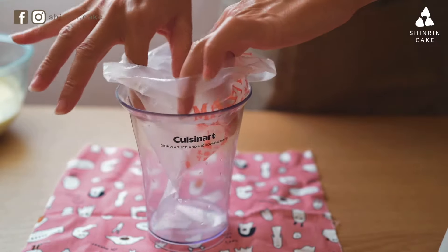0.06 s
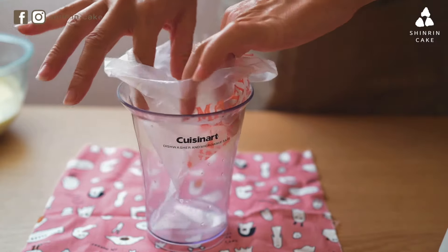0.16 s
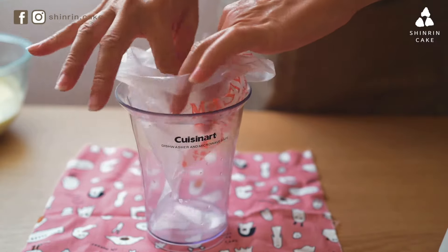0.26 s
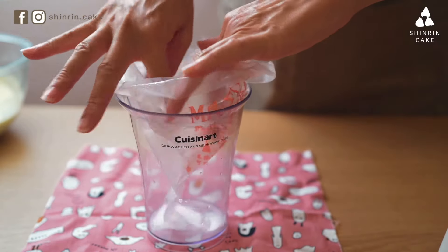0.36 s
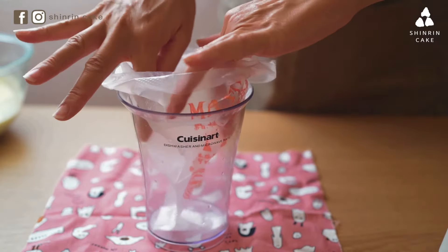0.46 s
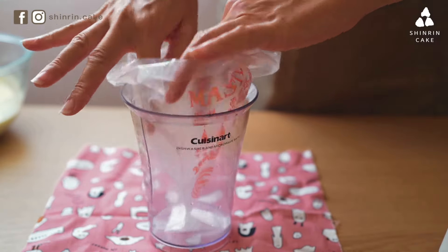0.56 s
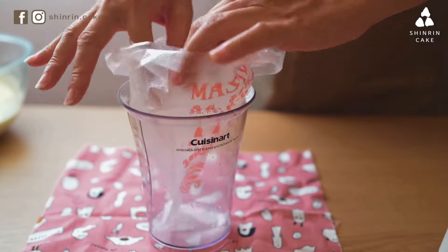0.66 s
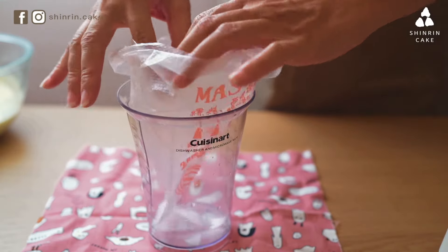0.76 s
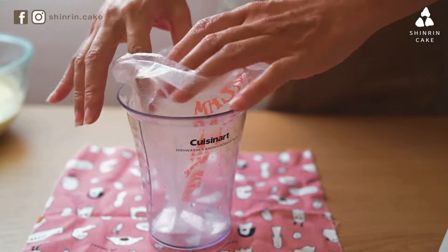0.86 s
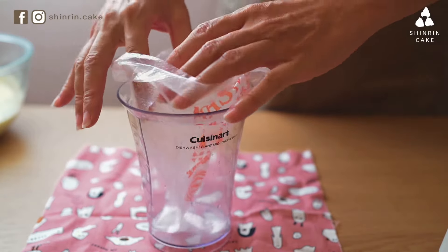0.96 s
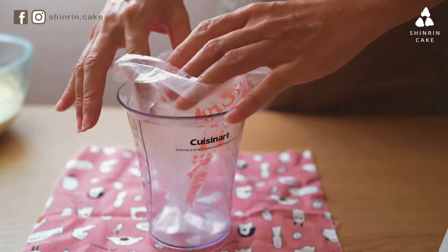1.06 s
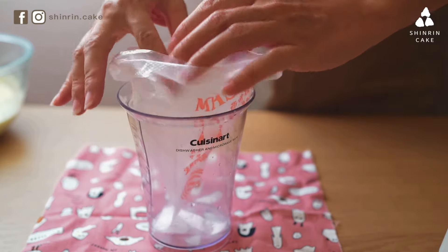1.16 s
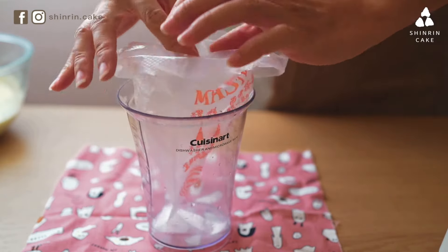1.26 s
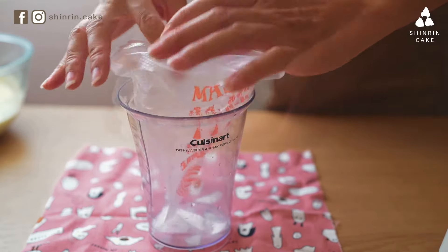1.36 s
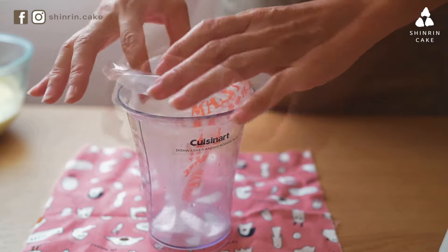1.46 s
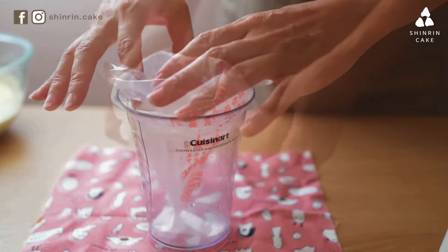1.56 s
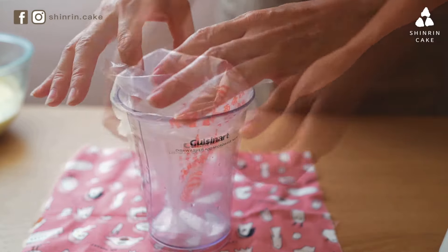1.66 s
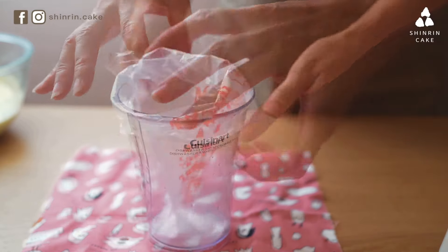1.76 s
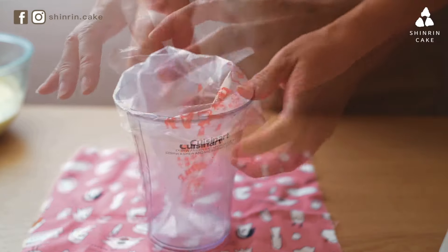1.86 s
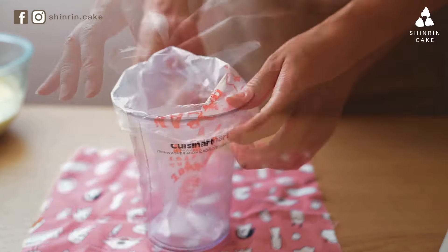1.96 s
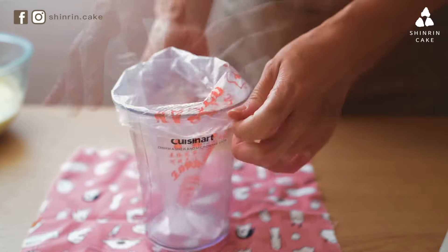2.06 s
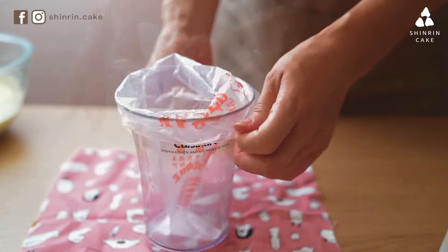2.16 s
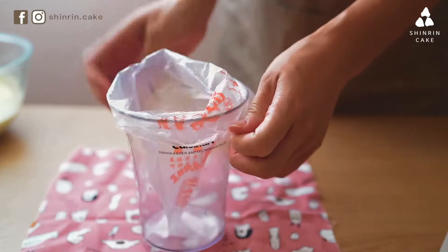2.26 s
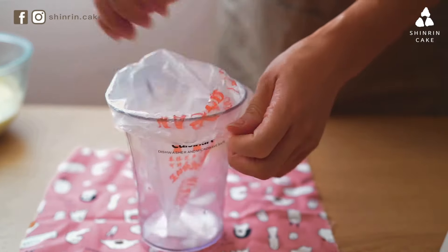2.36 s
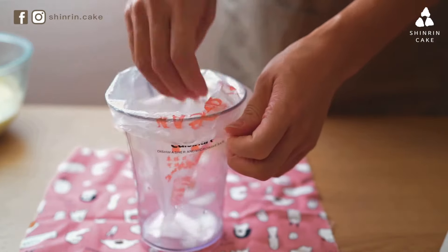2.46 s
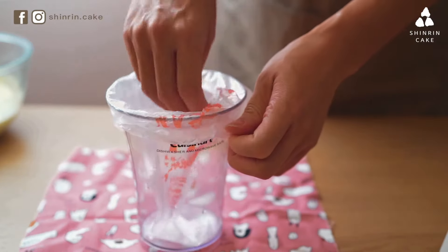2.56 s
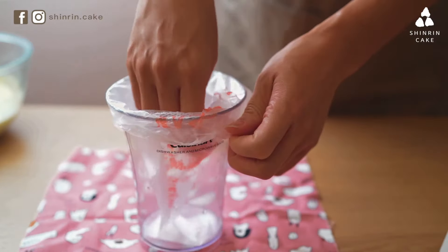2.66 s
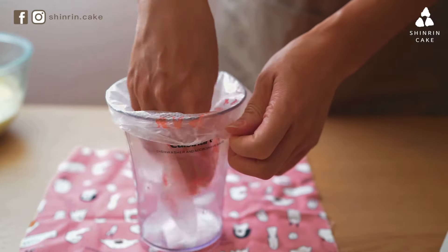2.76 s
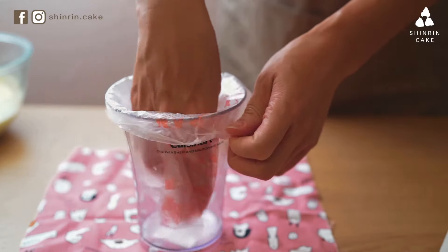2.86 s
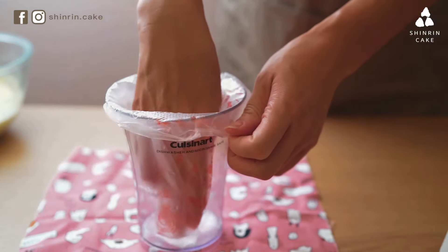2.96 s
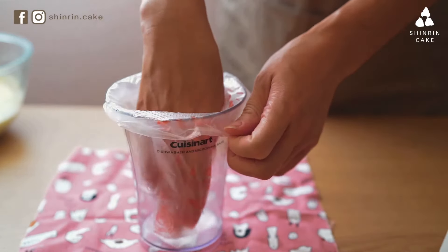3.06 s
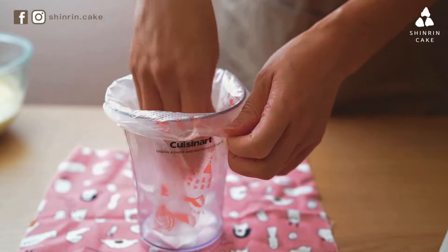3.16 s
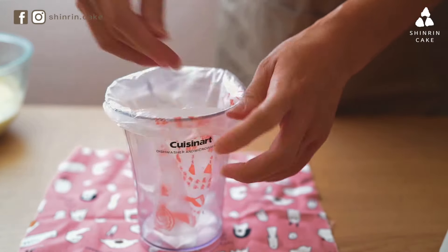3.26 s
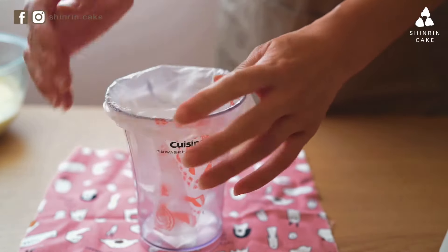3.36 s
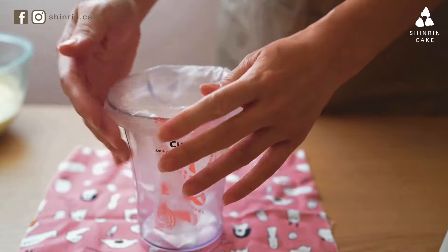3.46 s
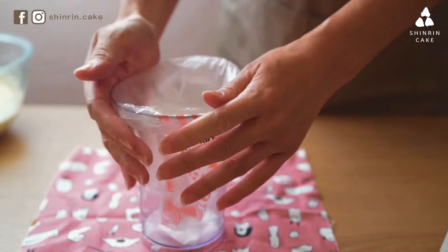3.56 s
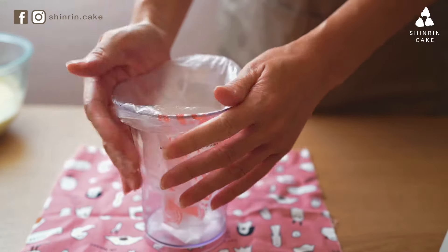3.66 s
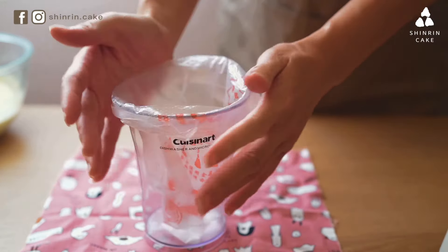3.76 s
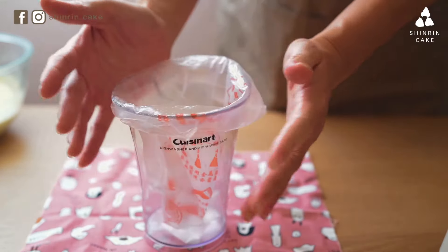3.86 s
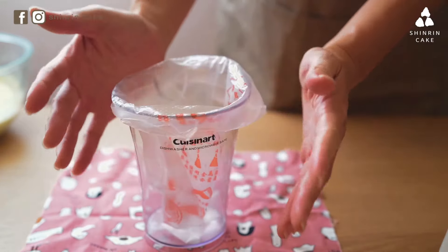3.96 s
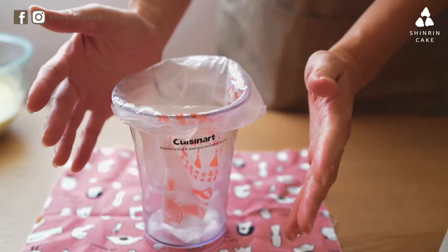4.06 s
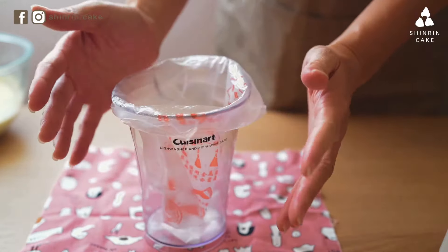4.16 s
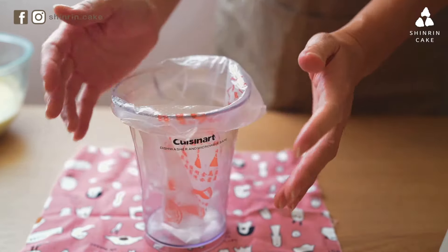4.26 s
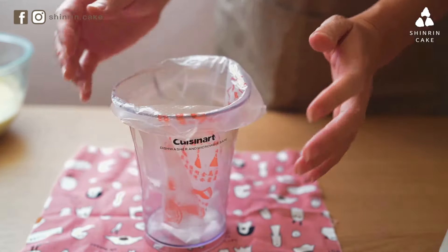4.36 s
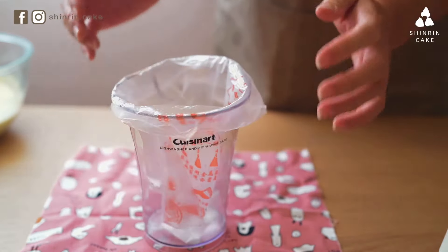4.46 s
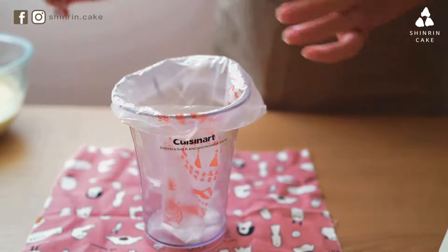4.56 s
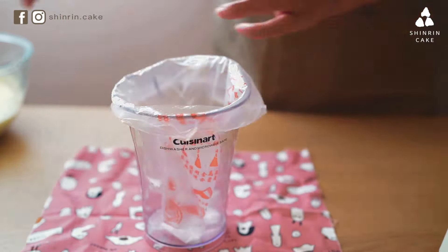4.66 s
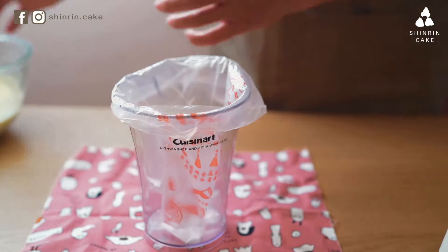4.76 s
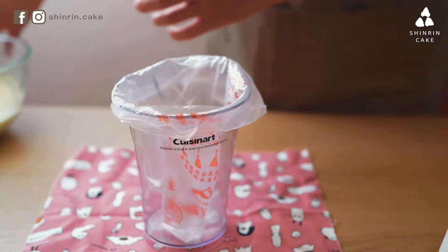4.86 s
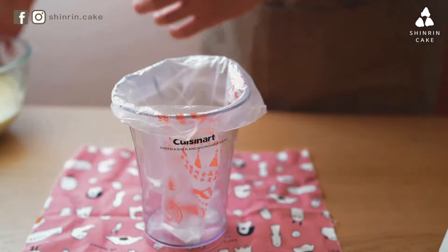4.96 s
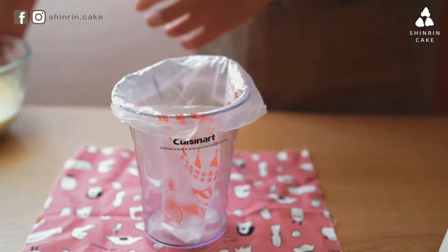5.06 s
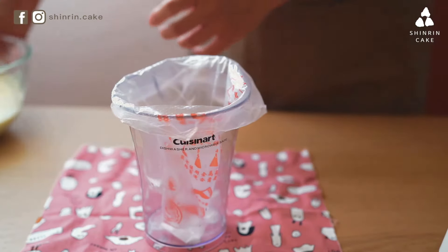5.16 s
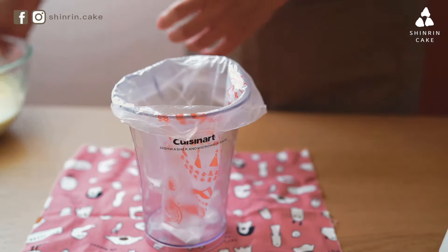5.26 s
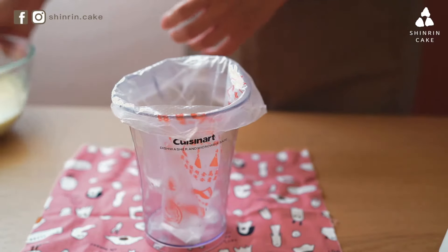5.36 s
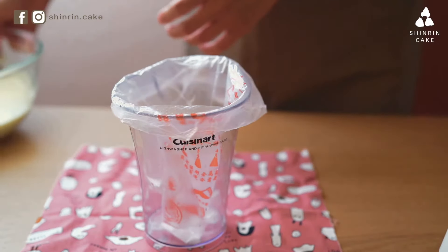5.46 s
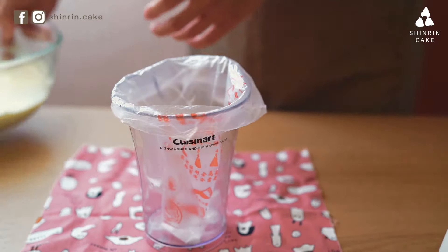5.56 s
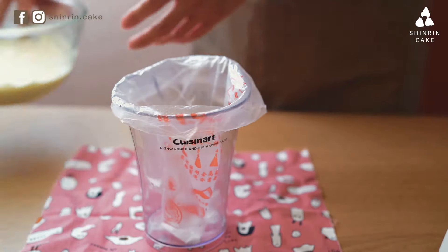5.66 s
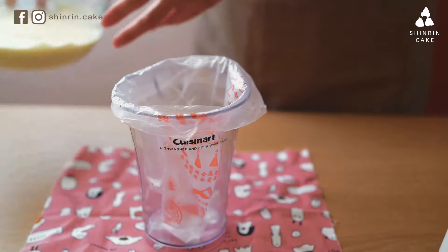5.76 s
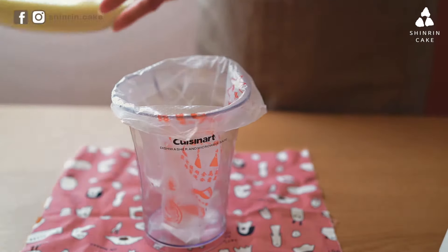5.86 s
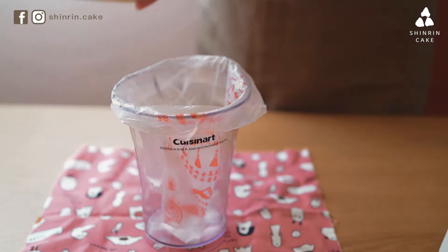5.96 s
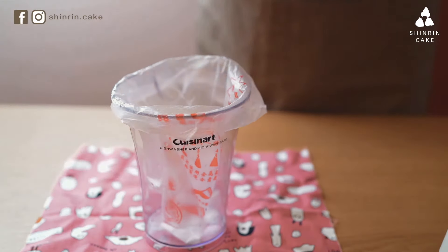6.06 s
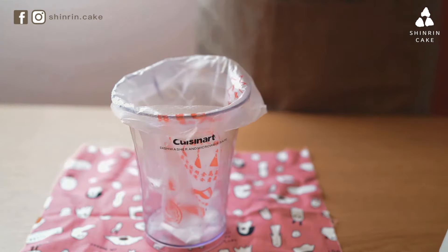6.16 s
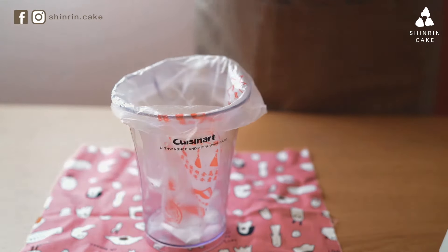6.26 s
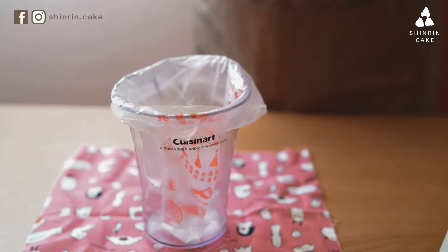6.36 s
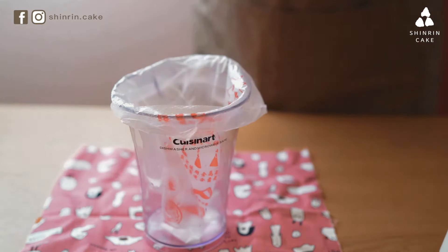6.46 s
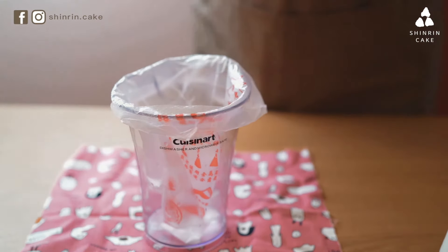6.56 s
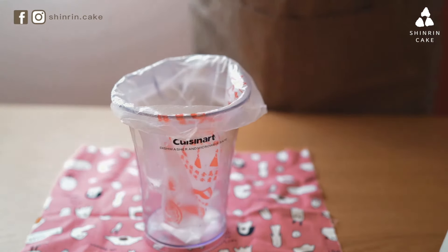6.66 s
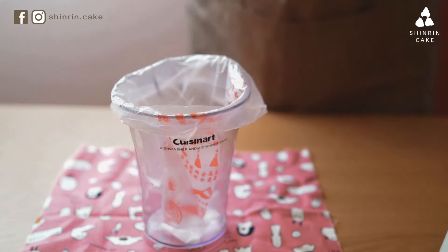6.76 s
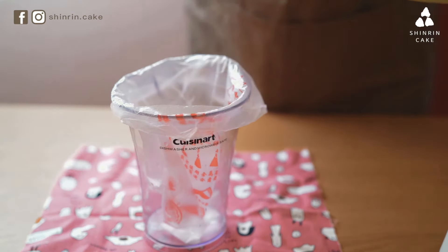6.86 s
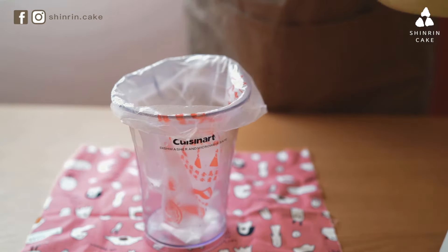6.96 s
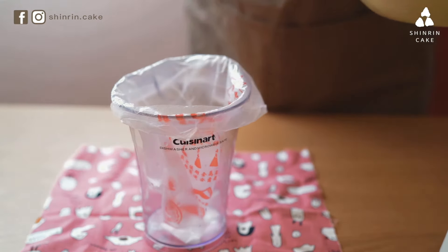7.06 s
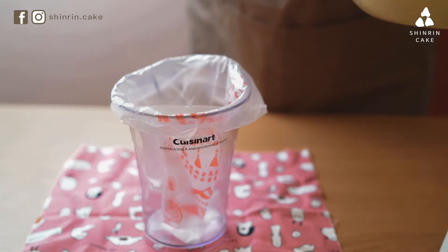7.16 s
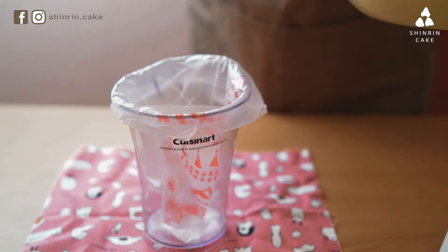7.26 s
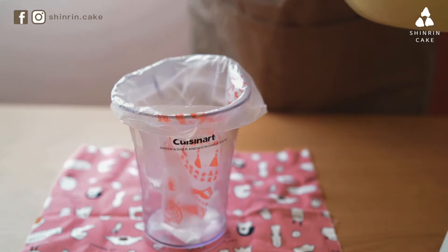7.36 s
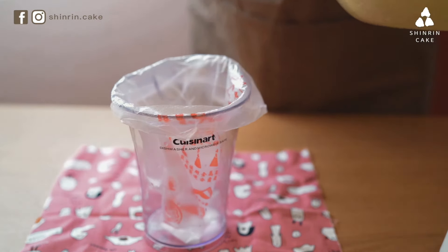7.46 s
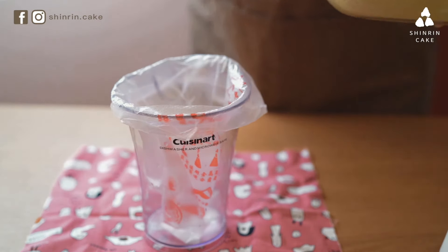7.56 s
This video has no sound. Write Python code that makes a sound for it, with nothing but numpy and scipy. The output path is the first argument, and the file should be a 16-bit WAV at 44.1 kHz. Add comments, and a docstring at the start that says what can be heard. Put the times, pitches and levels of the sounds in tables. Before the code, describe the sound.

Close to the microphone, thin plastic film crinkles busily from the start, swelling and easing with each grip, peppered with crisp pops. A rubbing stick-slip slide follows as the hand presses the lining down the cup wall. After a flurry of small snaps it falls nearly silent: low hum, a few ticks, soft sleeve rustle, a low puff of air, tiny dish clinks and thuds in a lightly reverberant kitchen.

```python
"""Over a low appliance hum, a thin plastic piping bag is folded over the rim of a tall plastic cup and pushed
down inside it: random facet rattles make the dense crackle, noise bursts with short rings the sharp snaps,
and jolted resonances the slide along the wall. Once let go, the film ticks a few times as it settles.
Then cloth brushes faintly as filtered noise, with soft bumps of low noise, a slow puff of air and light
clinks of decaying sines as a bowl is picked up."""
import sys
import numpy as np
from scipy import signal
from scipy.fft import rfft, irfft
from scipy.io import wavfile
from scipy.ndimage import uniform_filter1d

SR = 44100
rng = np.random.default_rng(int(sys.argv[2]) if len(sys.argv) > 2 else 0)


def master_out(mix):
    """Clip the mix to full scale and print it as 16-bit PCM to the path in sys.argv[1]."""
    frames = np.transpose(np.atleast_2d(mix))
    ceiling = np.clip(frames, -1, 1)
    pcm = np.round(ceiling * 32767).astype(np.int16)
    wavfile.write(sys.argv[1], SR, pcm)


N = 335595
TIME = np.arange(N) / SR


def from_db(db):
    """Decibels to gain."""
    return 10 ** (np.asarray(db) / 20)


def rms_one(x):
    """Scale to rms 1."""
    return x / np.sqrt(np.mean(x ** 2) + 1e-20)


def opening_one(x, size=132):
    """Scale to rms 1 over the first 3 ms."""
    return x / np.sqrt(np.mean(x[:size] ** 2))


def local_rms(x, seconds):
    """Running level: the power is averaged twice over a sliding window."""
    width = int(seconds * SR)
    power = uniform_filter1d(uniform_filter1d(x * x, width), width)
    return np.sqrt(np.abs(power) + 1e-12)


def add(out, s, sound):
    """Mix a sound in at time s."""
    start = max(round(s * SR), 0)
    out[start:start + len(sound)] += sound[:N - start]


def cut(x, hz, kind, order=2):
    """Butterworth filter."""
    return signal.sosfilt(signal.butter(order, hz, kind, fs=SR, output="sos"), x + 1e-18)


def resonate(x, hz, width_hz):
    """Two-pole resonance with gain 1 on top."""
    r = np.exp(-np.pi * width_hz / SR)
    feed = [(1 - r * r) / 2, 0, (r * r - 1) / 2]
    feedback = [1, -2 * r * np.cos(2 * np.pi * hz / SR), r * r]
    return signal.lfilter(feed, feedback, x + 1e-18)


def colour(x, spectrum, size=4096):
    """Causal (minimum-phase) filter that follows a spectrum."""
    hz, db = np.transpose(spectrum)
    grid = np.maximum(np.arange(size // 2 + 1) * SR / size, 1)
    log_gain = np.log(from_db(np.interp(np.log(grid), np.log(hz), db)))
    # the folded cepstrum gives the minimum phase
    cepstrum = irfft(log_gain)[:size // 2]
    cepstrum[1:] *= 2
    impulse = irfft(np.exp(rfft(cepstrum, size)))
    return signal.oaconvolve(x, impulse)[:len(x)]


def burst(t60, seconds):
    """Noise that dies away, with energy 1."""
    t = np.arange(int(seconds * SR)) / SR
    noise = rng.standard_normal(len(t)) * from_db(-60 * t / t60)
    return noise / np.linalg.norm(noise)


def mode(hz, t60, seconds):
    """A struck resonance: a sine that dies away."""
    t = np.arange(int(seconds * SR)) / SR
    return np.sin(2 * np.pi * hz * t) * from_db(-60 * t / t60)


def slow_noise(per_s):
    """Smooth random wandering with rms 1."""
    knots = rng.standard_normal(1000)
    return rms_one(np.interp(TIME * per_s, np.arange(len(knots)), knots))


def movements(rows, sag_db_per_s, release_db_per_s):
    """Gain of overlapping movements (s, attack s, hold s, dB): each swells, sags while held, then dies away."""
    attack_rise_db = 22.5  # climb over the length of the attack
    power = 1e-12
    for s, attack_s, hold_s, level_db in rows:
        t = TIME - s
        swell = attack_rise_db * np.minimum(t, 0) / attack_s
        sag = sag_db_per_s * np.clip(t, 0, hold_s)
        release = release_db_per_s * np.maximum(t - hold_s, 0)
        power = power + from_db(np.maximum(level_db + swell - sag - release, -150)) ** 2
    return np.sqrt(power)


def room_air():
    """Steady room noise, mostly low."""
    # Each row: frequency in Hz, relative level in dB per Hz.
    room_tone = [(20, -14.5), (35, -2), (80, -5.5), (110, -6), (160, 3), (260, -6.5), (500, -7.5),
                 (1000, -14), (2000, -21.5), (2800, -17.5), (4000, -39.5), (7000, -36), (16000, -42.5)]
    return from_db(-60.0) * rms_one(colour(rng.standard_normal(N), room_tone))


def appliance_hum():
    """Steady sines, each with a little narrow noise at its pitch that makes it waver."""
    # Each row: frequency in Hz, level of the sine in dB rms, time in seconds by which it has faded out.
    hum_tones = [(58.8, -63, 9), (81, -77.5, 9), (125.4, -65.5, 2.1), (154.3, -68.5, 9)]
    hum = np.zeros(N)
    for hz, level_db, end_s in hum_tones:
        waver = rms_one(resonate(rng.standard_normal(N), hz, width_hz=6))
        running = np.clip((end_s - TIME) / 0.46, 0, 1)
        tone = np.sqrt(2) * np.sin(2 * np.pi * hz * TIME)
        hum += from_db(level_db) * running * (tone + 0.16 * waver)
    return hum


def puff():
    """Moved air: very low noise that swells and fades once."""
    # The puff's level over time. Each row: time in seconds, level in dB.
    draught = [(5.87, -86), (5.91, -46), (6.04, -40.5), (6.19, -51), (6.55, -56.5), (6.8, -75)]
    s, level_db = np.transpose(draught)
    air = rms_one(cut(rng.standard_normal(N), [7, 17], "band"))
    return from_db(np.interp(TIME, s, level_db)) * air


def cloth():
    """Fibres catch and slip so densely that they merge to a soft brushing."""
    # Sleeves and apron brush as the arms move.
    # Each row: time of full speed in seconds, attack in seconds, hold in seconds, level in dB.
    brushes = [(4.55, 0.16, 0.47, -62.5), (5.4, 1, 0.14, -63), (5.54, 0.079, .01, -51.5),
               (5.95, 0.33, 0.038, -54), (6.6, 0.54, 0.24, -66.5)]
    # Tone of the fabric. Each row: frequency in Hz, relative level in dB per Hz.
    fabric = [(300, -22.5), (1000, -7), (1800, -7), (2800, 3), (3700, -5), (5000, -9.5), (8000, -21),
              (15000, -28)]
    rest_db = -74.5  # the apron never hangs quite still
    unevenness_db = 2.2 * rms_one(cut(rng.standard_normal(N), 56, "low"))
    fibres = rng.standard_normal(N) * from_db(unevenness_db)
    moving = movements(brushes, sag_db_per_s=8, release_db_per_s=113)
    speed = np.hypot(moving, from_db(rest_db))
    return speed * rms_one(colour(fibres, fabric))


def bumps():
    """Dull thuds in the table top: short bursts of low noise."""
    # Each row: start in seconds, peak in dB.
    thuds = [(5.346, -44.5), (6.746, -47)]
    out = np.zeros(N)
    for s, peak_db in thuds:
        thud = cut(burst(0.09, seconds=.2), [90, 280], "band")
        add(out, s, from_db(peak_db) * thud / np.abs(thud).max())
    return out


def strike(knocks, modes):
    """Each knock rings all the modes; a hand on the piece damps it sooner, so the ring length varies."""
    out = np.zeros(N)
    for s, level_db, length in knocks:
        for hz, mode_db, t60 in modes:
            ring = mode(hz, t60 * length, seconds=.5) * rng.choice([-1, 1])
            add(out, s, from_db(level_db + mode_db) * ring)
    return out


def bowl_clinks():
    """A glass bowl clinks lightly: its modes ring as decaying sines."""
    # Each row: start in seconds, level in dB added to every mode, ratio that scales the ring times.
    clinks = [(4.858, -59, 1.8), (6.12, -51.5, 0.26)]
    # Modes of the bowl. Each row: frequency in Hz, relative level in dB, unscaled 60 dB decay in seconds.
    bowl = [(1445, -4.5, 0.42), (2650, 2, 0.16), (2640, -2, 0.054), (4100, -5.5, 0.13), (5720, -16.5, .17)]
    return strike(clinks, bowl)


def dish_knock():
    """A dish is knocked once and its modes ring briefly."""
    # Each row: start in seconds, level in dB added to every mode, ratio that scales the ring times.
    knocks = [(6.7465, -44, 0.75)]
    # Modes of the dish. Each row: frequency in Hz, relative level in dB, unscaled 60 dB decay in seconds.
    dish = [(1160, -13, .05), (1400, -7, 0.15), (1496, -5, .06), (2400, -6.5, 0.18), (2606, 3.5, 0.041),
            (2930, -9, 0.073), (3780, -8, 0.11), (3840, -4, .05), (5360, -25, .2)]
    return strike(knocks, dish)


def slide():
    """Skin and film stick and slip along the wall, each slip jolting the resonances unevenly."""
    # The hand presses and slides down inside the lined cup.
    # Each row: time of full force in seconds, attack in seconds, hold in seconds, level in dB.
    slides = [(2.46, 0.073, 0.16, -53), (2.655, 0.12, 0.28, -30.5), (3.12, 0.28, 0.0067, -36)]
    # Film stretched against the cup wall. Each row: resonance in Hz, width in Hz, relative level in dB.
    wall = [(560, 150, -8.5), (1690, 180, -3.5), (2198, 390, -3.5), (2830, 130, 1.5)]
    slips = (rng.random(N) < 450 / SR) * from_db(2.3 * rng.standard_normal(N))
    rub = np.zeros(N)
    for hz, width_hz, level_db in wall:
        rub += from_db(level_db) * resonate(slips * rng.standard_normal(N), hz, width_hz)
    force = movements(slides, sag_db_per_s=6.5, release_db_per_s=177)
    return force * rub / local_rms(rub, seconds=0.097)


def snaps(rows):
    """A crease pops through in a few milliseconds of noise and sets the taut film ringing."""
    # Tone of the crack. Each row: frequency in Hz, relative level in dB per Hz.
    crack_tone = [(150, -17), (600, -5.5), (1000, -12.5), (1600, -6), (4000, 2.5), (7000, 3), (12000, -0.5),
                  (16000, -9.5)]
    # Modes of a taut patch of film.
    # Each row: ratio to the ring pitch, level in dB before random scatter, 60 dB decay in seconds.
    patch = [(.25, -14, 0.017), (.58, -5, 0.0076), (.86, -5.5, .008), (1, 1, 0.02), (1.14, -2, .009)]
    out = np.zeros(N)
    for s, crack_db, ring_db, hz in rows:
        pop = burst(.0085, seconds=.05) + from_db(-14) * burst(.04, seconds=.05)
        # the buckle takes a moment to spread along the crease
        spread = 1 - np.exp(-np.arange(len(pop)) / (.0004 * SR))
        crack = colour(pop * spread, crack_tone)
        ring = np.zeros(len(pop))
        for ratio, mode_db, t60 in patch:
            gain = from_db(mode_db + rng.normal(0, 1.3)) * rng.choice([-1, 1])
            ring += gain * mode(ratio * hz, t60, seconds=.05)
        add(out, s, from_db(crack_db + 0.5) * opening_one(crack))
        add(out, s, from_db(ring_db + 0.5) * opening_one(ring * spread))
    return out


def small_snaps(crackle, count=200):
    """Lesser creases snap at random while the film is worked, stronger under a firm grip."""
    per_s = 15  # candidates, before the weak moments drop out
    crack_offset_db, ring_offset_db, scatter_db = 2.5, -1.5, 3.5
    ring_hz, ring_scatter_hz = 2676, 190
    follows = 0.52  # share of the crackle's swing that a snap follows
    threshold_db = -56.5  # no lesser crease snaps under a weaker crackle
    times = np.cumsum(rng.gamma(2, .5 / per_s, count))
    crackle_db = np.interp(times, TIME, 20 * np.log10(crackle))
    force_db = -35 + follows * (crackle_db + 35)
    crack, ring, pitch = rng.standard_normal((count, 3)).T
    crack_db = force_db + crack_offset_db + scatter_db * crack
    ring_db = force_db + ring_offset_db + scatter_db * ring
    rows = np.transpose([times, crack_db, ring_db, ring_hz + ring_scatter_hz * pitch])
    return snaps(rows[crackle_db > threshold_db])


def big_snaps():
    """The loudest creases snap through while the bag is worked; the last few tick as the film settles."""
    # Each row: start in seconds, crack in dB, ring in dB (both over the first 3 ms, before a lift of 0.5 dB),
    # ring pitch in Hz.
    creases = [(0.1546, -52, -32, 2560), (0.1743, -31.5, -44.5, 2650), (0.3923, -30, -25, 2720),
               (0.4581, -26, -43, 2540), (0.6347, -32, -49.5, 3000), (0.7046, -29, -28, 2800),
               (1.0018, -33.5, -41, 3040), (1.0411, -38, -36, 2450), (1.0618, -44, -30.5, 2470),
               (1.1183, -31.5, -37, 2450), (1.2205, -42, -36, 2330), (1.2492, -42.5, -35.5, 2560),
               (1.2949, -46, -36, 1880), (1.34, -44, -46, 2630), (1.3949, -30.5, -33, 2430),
               (1.5541, -31.5, -33.5, 2510), (1.6694, -48, -45, 2510), (1.7685, -43, -40.5, 2540),
               (1.8046, -42.5, -44, 2820), (2.0008, -40.5, -30, 2370), (2.1507, -27.5, -24.5, 2880),
               (2.2722, -22.5, -32, 2780), (2.6795, -30, -28.5, 2690), (2.8693, -51, -21, 2700),
               (2.9363, -29, -23.5, 1670), (3.0771, -32, -24.5, 2940), (3.212, -35, -52.5, 2670),
               (3.2265, -36, -53, 3090), (3.267, -40, -45, 2940), (3.3215, -52, -50, 1740),
               (3.4241, -54.5, -42.5, 2920), (3.4355, -34, -37.5, 2700), (3.441, -35, -38, 2680),
               (3.4537, -33, -44.5, 2750), (3.4752, -33, -40, 2910), (3.5058, -30, -45, 2860),
               (3.5489, -30, -33, 2770), (3.5971, -25, -32, 2430), (3.6841, -35, -34.5, 2700),
               (3.7281, -29, -36.5, 2830), (3.7985, -36, -38, 2510), (3.8303, -49, -39.5, 2850),
               (3.8682, -55, -41.5, 2760), (4.0346, -41, -44, 2750), (4.4452, -46.5, -38.5, 2500),
               (4.5197, -52, -43, 2860), (5.8243, -66, -50, 2874), (6.6219, -53.5, -59, 2604),
               (7.3752, -41, -48, 2770)]
    return snaps(creases)


def gripping():
    """Gains of the crackle and of the wide panels as the fingers grip and fold the bag."""
    # Each row: time of full force in seconds, attack in seconds, hold in seconds, crackle above 3.5 kHz in dB,
    # rustle of the wide panels at 400-2200 Hz in dB; both levels before the crinkle's final trim.
    grips = [(-0.008, 0.071, 0.048, -27, -32), (0.171, 0.043, 0.08, -43, -40.5),
             (0.39, 0.13, 0.034, -27, -33.5), (0.539, 0.092, 0.04, -34.5, -38),
             (0.696, 0.13, 0.0091, -36.5, -40.5), (0.851, 0.21, 0.029, -31, -37),
             (1.125, 0.19, 0.039, -39, -42.5), (1.399, 0.026, 0.011, -39.5, -42.5),
             (1.47, .08, 0.059, -36, -39), (1.708, .08, 0.11, -52, -51.5), (1.889, 0.062, 0.14, -45.5, -55),
             (2.067, 0.16, 0.096, -31, -34), (2.237, 0.1, 0.012, -34.5, -36),
             (2.445, 0.024, .058, -28, -31), (2.572, .06, 0.11, -34.5, -41),
             (2.663, 0.054, 0.075, -26.5, -35), (2.834, 0.26, 0.17, -28, -35),
             (3.064, 0.2, 0.071, -34, -41.5), (3.243, .06, 0.012, -54, -54),
             (3.442, 0.016, 0.042, -36, -48), (3.513, 0.039, 0.11, -35.5, -44.5),
             (3.698, 0.12, 0.027, -45.5, -59)]
    s, attack_s, hold_s, crackle_db, panels_db = np.transpose(grips)
    gains = []
    for level_db in (crackle_db, panels_db):
        rows = np.transpose([s, attack_s, hold_s, level_db])
        # the film yields under a held grip, then relaxes
        gains.append(movements(rows, sag_db_per_s=12, release_db_per_s=161))
    return gains


def buckles(per_s, spread_db, facet_t60, tilt_db, pitch_db, patchy_db, count=24):
    """Facets of film flip at random, each with its own brief rattle; the strain wanders from facet to facet."""
    sizes = from_db(spread_db * np.minimum(rng.exponential(1, N), 4.5)) * rng.choice([-1, 1], N)
    flips = sizes * (rng.random(N) < per_s / SR)
    facet = rng.integers(0, count, N)
    tilts = np.linspace(-tilt_db, tilt_db, count)
    pitches = np.geomspace(1550, 14500, count)
    out = np.zeros(N)
    for k, (tilt, hz) in enumerate(zip(tilts, pitches)):
        # facet_t60 is the decay at 3 kHz: higher facets die sooner
        rattle = burst(facet_t60 * np.sqrt(3000 / hz), seconds=.012)
        low = cut(rattle, 3000, "low", order=1)
        pitched = from_db(pitch_db) * resonate(rattle, hz, hz / 5)
        rattle = low * from_db(-tilt) + (rattle - low) * from_db(tilt) + pitched
        strain = from_db(patchy_db * slow_noise(per_s=38))
        out += signal.oaconvolve(flips * strain * (facet == k), rattle)[:N]
    return out


def treble_ticks():
    """The tiniest creases tick in the top treble: sparse, very short specks of noise."""
    tiny = (rng.random(N) < 220 / SR) * from_db(1.2 * np.minimum(rng.exponential(1, N), 3))
    decay = np.exp(-1 / (.0005 * SR))
    specks = signal.lfilter([1], [1, -decay], tiny) * rng.standard_normal(N)
    return from_db(-6) * rms_one(cut(specks, 7500, "high"))


def crinkle(crackle, panels):
    """The more the wide panels move, the denser the creases flip; small creases carry the treble."""
    # Tone of the film. Each row: frequency in Hz, relative level in dB per Hz.
    film_tone = [(60, -22.5), (150, -12), (300, -4), (480, 0.5), (900, -3.5), (1400, 2.5), (2200, -7),
                 (3300, -3), (4200, -2), (7000, -6), (11000, -6.5), (16000, -14.5)]
    # Resonances that colour the crinkling. Each row: frequency in Hz, width in Hz, lift in dB.
    resonances = [(520, 23, 5), (608, 37, 9), (1735, 65, 6.5), (2536, 190, 14), (2810, 150, 11)]
    # 950 flips a second when the panels rustle at -39 dB
    per_s = 950 * (panels / from_db(-39)) ** .62
    grains = buckles(per_s, spread_db=1.5, facet_t60=0.015, tilt_db=4.5, pitch_db=7.0, patchy_db=0.5)
    # level the grains so that the grip alone sets the loudness
    even_grains = grains / local_rms(grains, seconds=0.14)
    plain = colour(even_grains + treble_ticks(), film_tone)
    film = plain
    for hz, width_hz, lift_db in resonances:
        film = film + (from_db(lift_db) - 1) * resonate(plain, hz, width_hz)
    worked = crackle > from_db(-70)
    treble_rms = np.std(cut(film, 3500, "high")[worked])
    body_rms = np.std(cut(film, [400, 2200], "band", order=4)[worked])
    # small creases carry the treble, wide panels the lows
    low = cut(film, 2700, "low", order=1)
    return from_db(-1) * (panels * low / body_rms + crackle * (film - low) / treble_rms)


def kitchen(x, wet_db):
    """Direct sound plus a diffuse tail, 4 ms later, whose treble dies sooner."""
    body_t60_s, treble_t60_s = 0.55, .27
    body = cut(burst(body_t60_s, seconds=.6), 5000, "low")
    treble = cut(burst(treble_t60_s, seconds=.6), 5000, "high")
    tail = np.concatenate([np.zeros(int(.004 * SR)), body + 0.47 * treble])
    return x + from_db(wet_db) * signal.oaconvolve(x, tail)[:N]


def scene():
    """Bag and dishes sound in the kitchen; cloth, hum and air are added without the room tail."""
    surroundings = room_air() + appliance_hum() + puff() + cloth()
    dishes = bumps() + bowl_clinks() + dish_knock()
    crackle, panels = gripping()
    bag = slide() + small_snaps(crackle) + big_snaps() + crinkle(crackle, panels)
    return (kitchen(bag + dishes, wet_db=-6.0) + surroundings)[None]


def record(dry):
    """The top is cut steeply at 15950 Hz."""
    return signal.sosfilt(signal.ellip(10, .2, 80, 15950, fs=SR, output="sos"), dry)


dry = scene()
out = record(dry)
master_out(out)
```